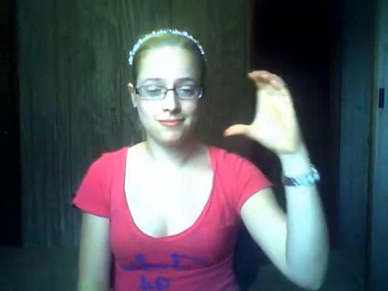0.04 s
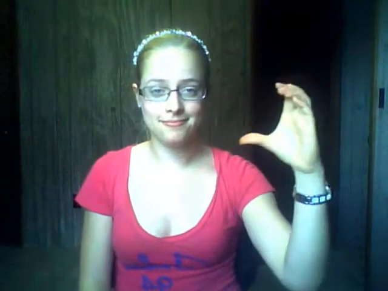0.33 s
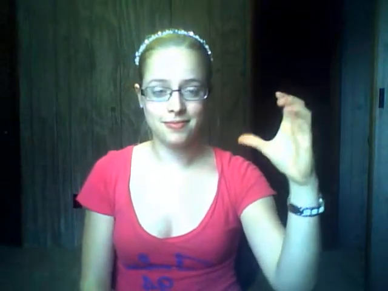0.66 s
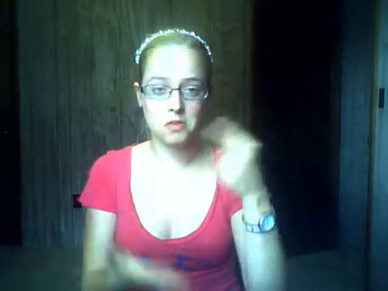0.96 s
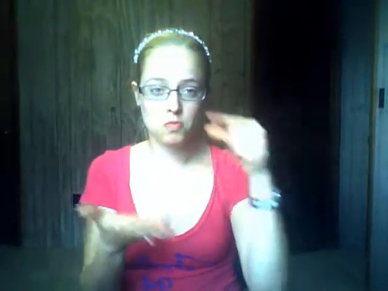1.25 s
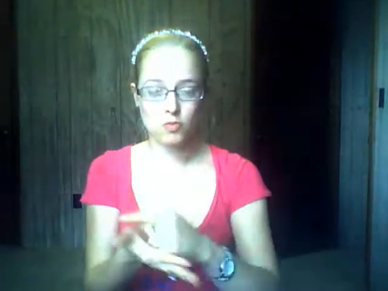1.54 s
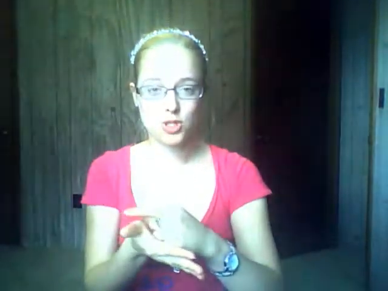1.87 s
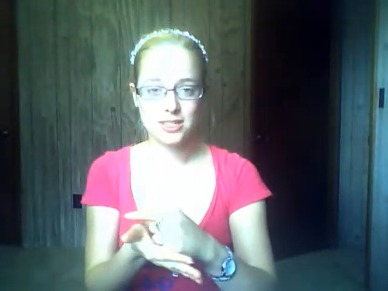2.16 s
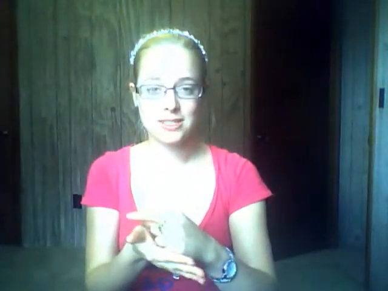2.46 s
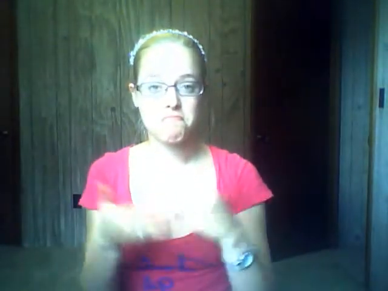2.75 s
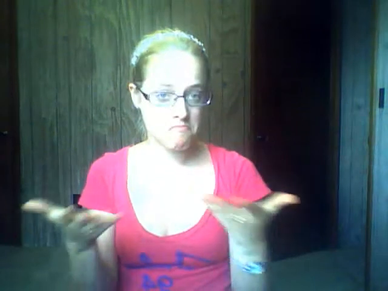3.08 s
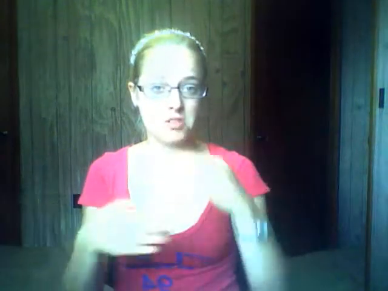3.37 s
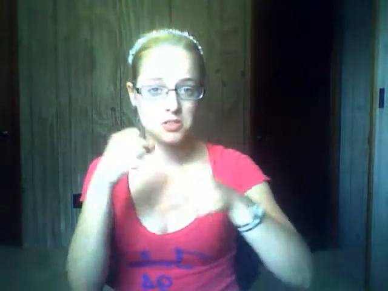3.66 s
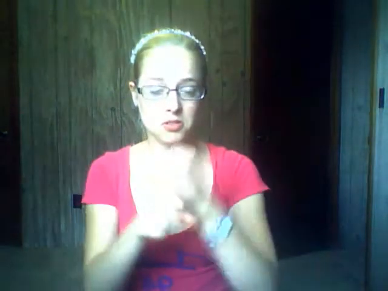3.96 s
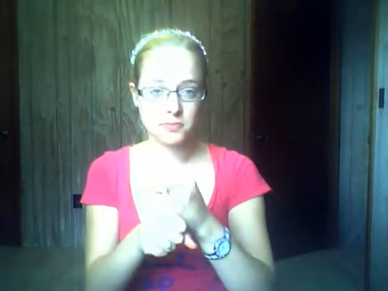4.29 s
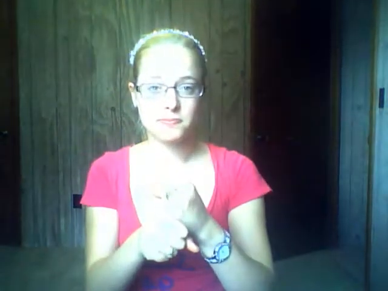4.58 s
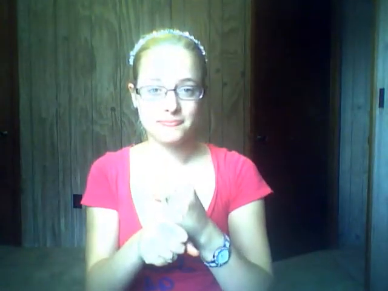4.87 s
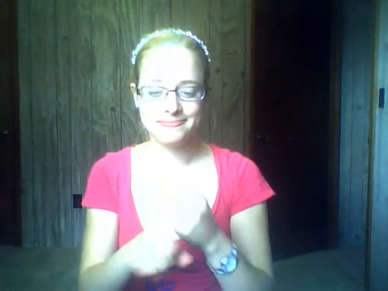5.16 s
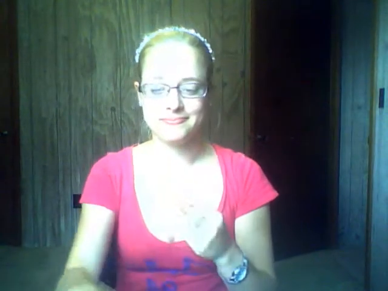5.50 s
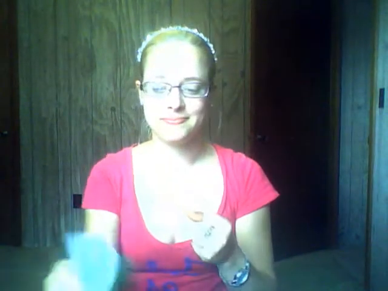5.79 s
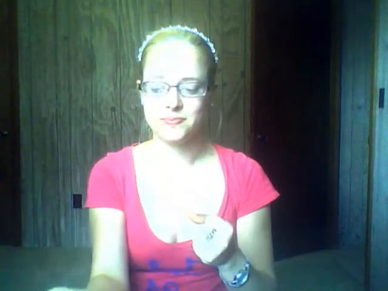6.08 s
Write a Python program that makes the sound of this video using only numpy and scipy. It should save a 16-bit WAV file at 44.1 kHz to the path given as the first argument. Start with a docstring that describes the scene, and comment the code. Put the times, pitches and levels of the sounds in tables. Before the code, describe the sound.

A laptop hums quietly while the microphone line pops three times, then something hard knocks twice on a desk and rattles.

```python
"""A laptop hums in a quiet room: its disk drones, its fan whines and hisses.
Three times the microphone line pops, a few ticks and a dull thump as the signal cuts out and sags.
Hands and sleeves brush faintly as someone signs silently. At the end something hard knocks twice
on the desk next to the microphone and sets it ringing, the second time with a rattle."""
import sys
import numpy as np
from scipy import signal
from scipy.fft import rfft, irfft
from scipy.io import wavfile

SR = 44100
rng = np.random.default_rng(int(sys.argv[2]) if len(sys.argv) > 2 else 0)


def inscribe(sig):
    """Save sig as 16-bit PCM at rate SR to the path in sys.argv[1].

    A 1-D sig is mono; a 2-D sig holds one channel per row.
    Samples are clipped to [-1, 1] before scaling.
    """
    pcm = np.round(np.clip(np.atleast_2d(sig).T, -1, 1) * 32767)
    wavfile.write(sys.argv[1], SR, pcm.astype(np.int16))


N = 274943
TIME = np.arange(N) / SR
SAG_DB, EARLY_SAG = -13.5, 0.74   # how far the line sinks in a pop; share not tied to the thump


def from_db(db):
    """Turn decibels into a factor to multiply by."""
    return 10 ** (np.asarray(db) / 20)


def low_pass(x, hz, order):
    """Soften everything above `hz`; a higher order cuts more steeply."""
    return signal.sosfilt(signal.butter(order, hz, fs=SR, output="sos"), x + 1e-18)


def noise(spectrum):
    """Noise of average strength (rms) 1, its colour drawn through (f/Hz, level/dB) points."""
    hz, db = np.transpose(spectrum)
    bins_hz = np.maximum(np.arange(N // 2 + 1) * SR / N, 1)
    gains = from_db(np.interp(np.log(bins_hz), np.log(hz), db))
    coloured = irfft(rfft(rng.standard_normal(N)) * gains, N)
    return coloured / np.sqrt(np.mean(coloured ** 2))


def drift(rate):
    """A slow wander that heads for a new random value `rate` times a second."""
    targets = rng.standard_normal(int(N / SR * rate) + 2)
    return np.interp(TIME * rate, np.arange(len(targets)), targets)


def ms_since(s):
    """Milliseconds since a moment, zero before it."""
    return np.maximum(TIME - s, 0) * 1000


def laptop(disk_hz=89.7, disk_db=-51.5, fan_hz=78.6, speed_wander=0.000643, flutter_db=1.0, air_db=-55.5):
    """The disk hums steadily; the fan's tones waver together over its rush of air."""
    # fan tones, 17 blades giving the whine: multiple of the turning rate, rms level/dB
    fan_tones = [(1, -64.5), (3, -84.5), (4, -78.5), (5, -78.5), (8, -75), (12, -78), (16, -70),
                 (17, -61.5), (51, -91.5)]
    # rush of the fan and rumble of the room: f/Hz, relative level/dB
    air_spectrum = [(20, 13.5), (53, 17), (66, 6), (125, 5), (165, -2), (500, -8), (850, -0.5),
                    (1330, -3.5), (1530, -5.5), (1930, -0.5), (2700, -17.5), (4200, -20.5), (6800, -25),
                    (16000, -56)]
    disk = from_db(disk_db) * np.sin(2 * np.pi * disk_hz * TIME)
    fan_angle = 2 * np.pi * np.cumsum(fan_hz * (1 + speed_wander * drift(6))) / SR
    fan = np.zeros(N)
    for multiple, db in fan_tones:
        loudness = from_db(db + flutter_db * drift(8.7))
        fan += loudness * np.sin(multiple * fan_angle + rng.uniform(0, 2 * np.pi))
    return np.sqrt(2) * (disk + fan) + from_db(air_db) * noise(air_spectrum)


def electronics(hiss_db=-99.0):
    """The electronics add a faint, even hiss and a thin whine."""
    # tones of the whine: f/Hz, rms level/dB
    whine_tones = [(3900, -93.5), (7800, -106), (11700, -114)]
    whine = sum(np.sqrt(2) * from_db(db) * np.sin(2 * np.pi * hz * TIME) for hz, db in whine_tones)
    return whine + from_db(hiss_db) * rng.standard_normal(N)


def line_pops(tick_ms=0.6, mute_after_ms=4.4, mute_ms=4.6, recover_ms=0.42, top_hz=7600, leak_s=0.046):
    """The microphone line ticks, drops out, then sags with a thump and returns."""
    # pops of the line: t/s, number of tries, click level/dB, length/ms,
    # thump delay/ms, thump level/dB, thump hold/ms, thump release/ms
    pops = [(0.105, 1, -38, 30.8, 17.3, -19, 2.2, 2.8), (0.5751, 1, -24.5, 33.5, 9.2, -10.5, 8.06, .45),
            (3.1852, 3, -35.5, 44.8, 18.46, -14.5, 10.2, 1.2)]
    offset = np.zeros(N)
    for s, tries, click_db, length_ms, delay_ms, thump_db, hold_ms, release_ms in pops:
        age = ms_since(s)
        try_age = since_try(age, tries)
        # each try opens with a tiny dropout, the tick; a longer one follows
        tick = (age > 0) & (try_age < tick_ms)
        dropped = tick | ((try_age > mute_after_ms) & (try_age < mute_after_ms + mute_ms))
        since_drop = age - np.maximum.accumulate(age * dropped)
        live = 1 - np.exp(-since_drop / recover_ms)   # cuts out at once, comes back softly
        sink = ramp(since_try(age - mute_after_ms - mute_ms, tries))
        sag = from_db(SAG_DB) * (EARLY_SAG * sink - ramp(age - length_ms))
        swing = thump(age - delay_ms, thump_db, hold_ms, release_ms)
        level = from_db(click_db) * dropped - live * (sag + swing)
        jumps = np.diff(level, prepend=0)
        offset += jumps * tick + low_pass(jumps * ~tick, top_hz, order=12)   # only ticks stay bright
    # the input capacitor lets every jump leak away
    return signal.lfilter([1], [1, -np.exp(-1 / (leak_s * SR))], offset + 1e-18)


def since_try(ms, tries, retry_ms=10):
    """Milliseconds since the stuttering line's latest try; the tries are evenly spaced."""
    return ms - retry_ms * np.clip(ms // retry_ms, 0, round(tries) - 1)


def ramp(ms, rise_ms=4.0, step_ms=0.25):
    """A rise from 0 to 1 in tiny steps, which chirp."""
    return np.clip((ms - ms % step_ms) / rise_ms, 0, 1)


def thump(ms, db, hold_ms, release_ms, attack_ms=0.46, bump_db=-23, bump_after_ms=10.5, bump_ms=2.2):
    """A dull swing of the line, then a softer bump; it leaves the rest of the sag behind."""
    attack = 1 - np.exp(-np.maximum(ms, 0) / attack_ms)
    release = np.exp(-np.maximum(ms - hold_ms, 0) / release_ms)
    bump = np.exp(-.5 * ((ms - hold_ms - bump_after_ms) / bump_ms) ** 2)
    late_sag = from_db(SAG_DB) * (1 - EARLY_SAG)
    return attack * (from_db(db) * release + from_db(bump_db) * bump + late_sag)


def brushes():
    """Skin and cloth rub, making soft swells of hiss."""
    # brushing movements: middle t/s, level/dB, swell width/s, strongest f/Hz
    strokes = [(1.575, -65, .004, 4000), (1.595, -75, .03, 4000), (5.680, -70.5, 0.062, 6000),
               (5.758, -67, .005, 3800), (5.915, -67.5, .014, 4300)]
    rubbing = np.zeros(N)
    for s, db, width_s, hz in strokes:
        hiss = noise([(hz / 10, -18), (hz / 2, -4.5), (hz, 0), (hz * 2, -18)])
        swell = np.exp(-.5 * ((TIME - s) / width_s) ** 2)
        rubbing += from_db(db) * swell * hiss
    return rubbing


def desk_knocks(crunch_db=-18, crunch_ms=11.0, room_db=-28, room_ms=16.0, spread_db=1.0, top_hz=6000):
    """Each hit sets the desk ringing, crunches briefly and dies away in the room."""
    # hits on the desk: t/s, relative level/dB, hardness as treble limit f/Hz
    hits = [(6.1123, -9.5, 1460), (6.1655, -7.5, 3000), (6.1745, -8.5, 2810), (6.1833, -11, 2000),
            (6.1878, -19.5, 2470), (6.2022, -26, 2200), (6.2127, -34, 1450)]
    # natural tones of the desk and laptop case: f/Hz, relative level/dB, time to fade by 60 dB/s
    desk_tones = [(58.3, -29, 0.28), (85, -21, 0.2), (132.2, -20.5, 0.21), (198.6, -15, 0.15),
                  (278, -16.5, 0.11), (427.5, -10.5, 0.072), (665.5, -14, 0.086), (818, -5.5, 0.047),
                  (895, -2, 0.039), (1039, -3.5, 0.054), (1246, -10, 0.071), (1420, -10.5, 0.044),
                  (1663, -12.5, 0.044), (1787, -11, 0.03), (1884, -15, 0.048), (2047, -22.5, .053),
                  (2354, -24.5, .038), (2760, -20, 0.034), (3480, -32.5, 0.023), (3860, -30, 0.036),
                  (5370, -34.5, 0.051)]
    # crunch of a hit and its spill into the room: f/Hz, relative level/dB
    crunch_spectrum = [(60, 0), (400, 2.5), (1000, 2), (1900, -4.5), (2400, -14), (4000, -23.5),
                       (4700, -36), (6300, -32), (7000, -53.5)]
    blows = []
    crunch, room = np.zeros(N), np.zeros(N)
    for s, db, hard_hz in hits:
        click = np.zeros(N)
        click[round(s * SR)] = from_db(db)
        blows.append(low_pass(click, hard_hz, order=2))   # a softer hit lasts longer and is duller
        age = ms_since(s)
        fade = np.exp(-age / crunch_ms)
        crunch += (age > 0) * from_db(db + crunch_db) * fade * hard_hz / 3000
        room += from_db(db + room_db) * (1 - fade) * np.exp(-age / room_ms)
    strengths = from_db(rng.normal(0, spread_db, (len(hits), len(desk_tones))))
    ringing = np.zeros(N)
    for k, (hz, db, fade_s) in enumerate(desk_tones):
        push = (-1) ** k * strengths[:, k] @ np.array(blows)   # neighbouring tones swing opposite ways
        ringing += from_db(db) * ring(push, hz, fade_s)
    crunching = np.hypot(crunch, room) * noise(crunch_spectrum)
    return low_pass(ringing + crunching, top_hz, order=10)   # the desk passes little that is higher


def ring(clicks, hz, fade_s):
    """Each click starts a pure tone that fades by 60 dB in `fade_s` seconds."""
    decay = np.exp(-np.log(1000) / (fade_s * SR))
    angle = 2 * np.pi * hz / SR
    return signal.lfilter([0, np.sin(angle)], [1, -2 * decay * np.cos(angle), decay ** 2], clicks + 1e-18)


def scene(mic_top_hz=7270):
    """The microphone hears the room without its high treble; pops, hiss and whine arise after it."""
    heard = low_pass(laptop() + desk_knocks() + brushes(), mic_top_hz, order=12)
    return (heard + line_pops() + electronics())[None]


def record(dry, cutoff_hz=16400):
    """Cut off the very highest treble."""
    return signal.sosfilt(signal.ellip(10, .1, 90, cutoff_hz, fs=SR, output="sos"), dry)


dry = scene()
out = record(dry)
inscribe(out)
```